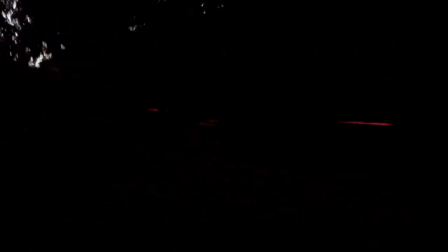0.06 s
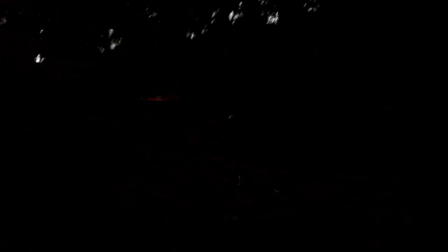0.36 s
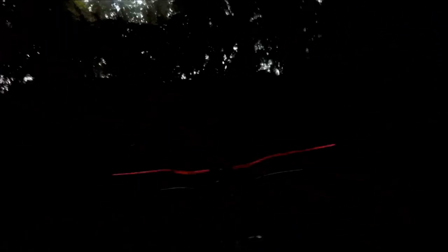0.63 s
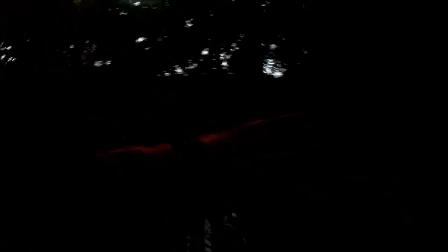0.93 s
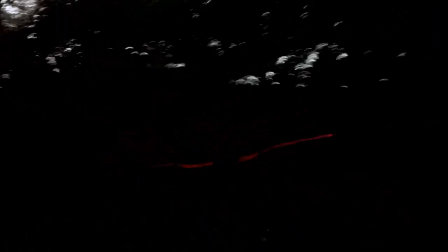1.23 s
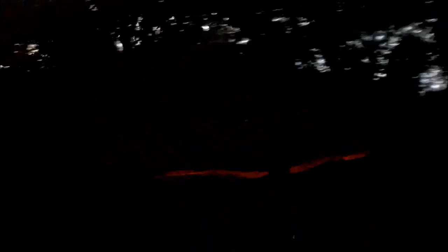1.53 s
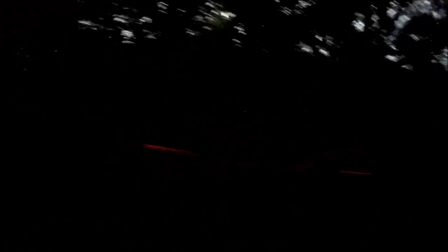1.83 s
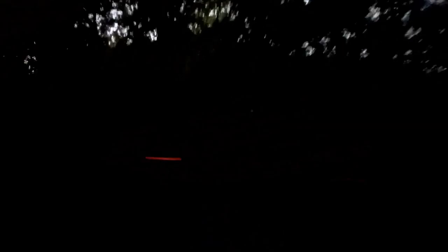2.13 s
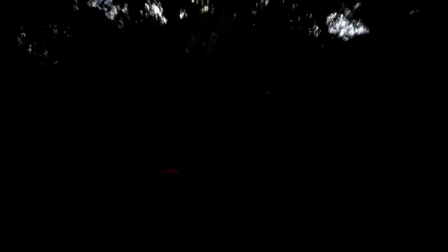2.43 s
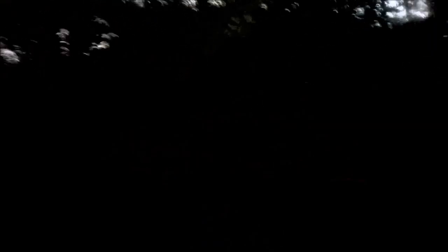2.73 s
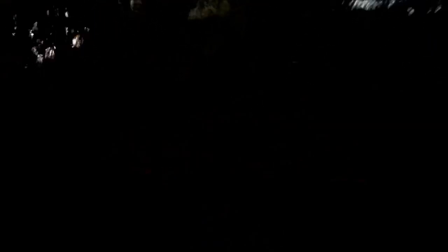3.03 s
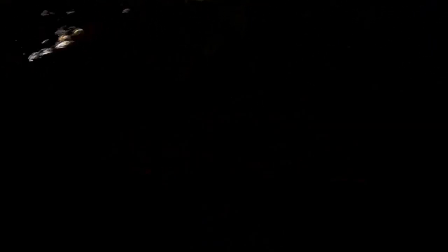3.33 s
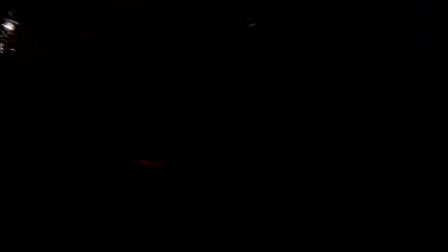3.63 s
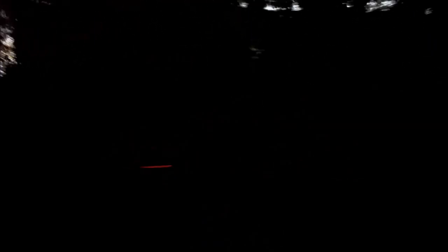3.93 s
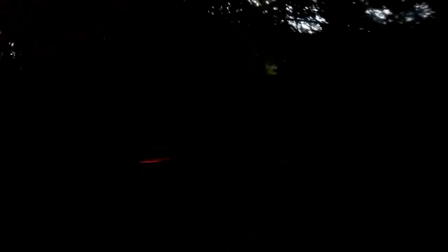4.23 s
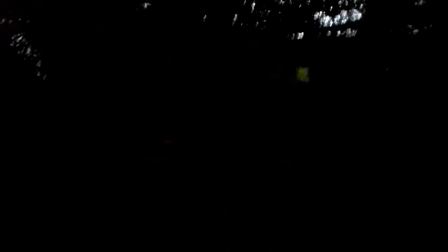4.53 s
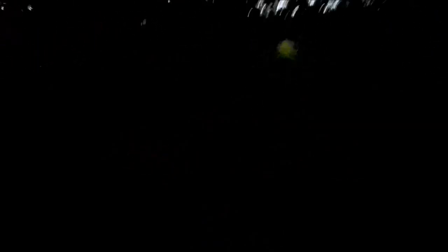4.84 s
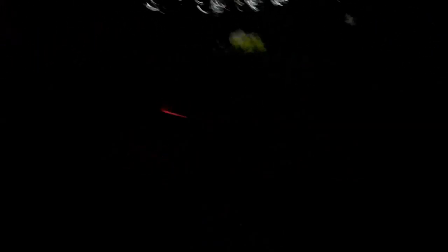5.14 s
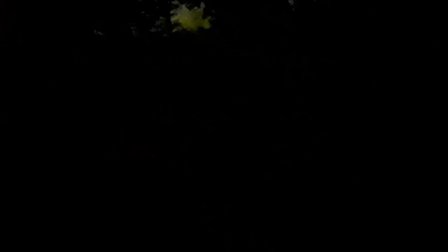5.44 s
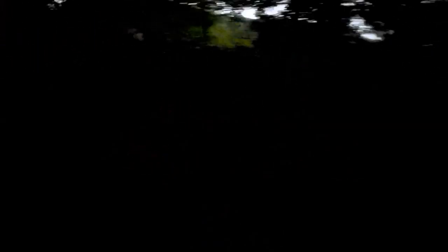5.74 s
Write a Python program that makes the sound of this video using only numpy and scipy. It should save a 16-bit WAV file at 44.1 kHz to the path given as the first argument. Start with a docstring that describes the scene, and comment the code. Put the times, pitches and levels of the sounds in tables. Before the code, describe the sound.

Heard from on board and without echo, bicycle tyres roll over loose grit and leaves on a wooded descent, while stones and chain tick against metal. Low gusts of wind rumble on the microphone. The bike then hits two rough stretches, separated by a brief lull, full of loud hollow knocks, tyre thumps, chain slaps and clattering levers. The wind is strongest in the second, and the rattling settles at the end.

```python
"""A mountain bike runs fast down a rough forest trail, heard from a camera carried on it.
At first the tyres crunch through grit and leaves, stones and chain tick on metal and a few jolts knock
the camera's mount. The trail smooths, and gusts buffet the microphone. From 2.3 s a long bed of roots
drives the bike into a dense rattle: the mount knocks, the chain slaps, cables and levers clack.
After a short lull, a second rough stretch brings the strongest wind; past 5.2 s the ride eases."""
import sys
import numpy as np
from scipy import signal
from scipy.fft import rfft, irfft, next_fast_len
from scipy.io import wavfile
from scipy.ndimage import uniform_filter1d, map_coordinates

SR = 44100
rng = np.random.default_rng(int(sys.argv[2]) if len(sys.argv) > 2 else 0)


def bounce(signal):
    """Save signal as a 16-bit WAV file at the path given by the first command-line argument."""
    frames = np.transpose(np.atleast_2d(signal))
    limited = np.clip(frames, -1, 1)
    pcm = np.round(limited * 32767).astype(np.int16)
    wavfile.write(sys.argv[1], SR, pcm)


N = 254456
t = np.arange(N) / SR

# Levels in the tables are relative: each source applies its own gain.
# Steady airflow between the gusts. Each row: time in seconds, level in dB.
AIRFLOW = [(0, -39.5), (.48, -46), (.7, -45), (1.4, -40.5), (2.0, -39), (3.4, -32.5), (3.7, -38),
           (4.5, -27), (5.77, -44.5)]
# Gusts on the microphone. Each row: start in seconds, length in seconds, level in dB.
GUSTS = [(.43, 0.054, -41), (.85, 0.059, -28.5), (.97, 0.12, -26.5), (1.09, 0.16, -25), (1.5, 0.12, -28),
         (1.6, 0.32, -24.5), (1.7, .2, -26), (1.95, 0.098, -34), (2.77, 0.1, -25.5), (3.03, 0.053, -28.5),
         (3.2, 0.083, -23.5), (3.33, 0.065, -38), (3.76, 0.088, -28.5), (4.06, 0.39, -31.5),
         (4.4, 0.1, -24.5), (4.58, 0.56, -22.5), (5.15, 0.19, -30.5), (5.58, 0.042, -29.5),
         (5.69, 0.092, -27)]
# Spectra of slow and of fast eddies. Each row: frequency in Hz, spectral density in dB.
SLOW_EDDY_SPECTRUM = [(10, -37), (25, 0), (40, 1), (75, -6.5), (130, -10), (300, -34.5), (1000, -73),
                      (5000, -120)]
FAST_EDDY_SPECTRUM = [(25, -20), (55, -3), (78, 6.5), (105, -1), (160, -3), (250, -8), (380, -13),
                      (1200, -59), (8000, -120)]

# Crunch of loose grit, and drone of the tread, which falls quiet on loose soil.
# Each row: time in seconds, level in dB.
CRUNCH_LEVEL = [(0, -45), (.25, -42.5), (.48, -49), (.7, -46.5), (1.17, -48.5), (1.33, -51), (1.47, -55),
                (1.7, -51), (2.1, -50.5), (2.301, -47), (2.75, -47), (3.5, -47.5), (3.68, -51.5),
                (3.8, -45), (4.45, -48), (4.85, -44), (5.1, -48), (5.24, -50), (5.77, -48.5)]
DRONE_LEVEL = [(0, -30.5), (.2, -30.5), (.5, -43), (1.4, -47.5), (2.4, -40.5), (5.0, -38), (5.77, -51)]
# Sprays of dry leaves and fine grit. Each row: start in seconds, length in seconds, level in dB.
SPRAYS = [(0, 0.016, -32.5), (.06, 0.035, -42.5), (.11, 0.092, -44), (.24, 0.073, -52), (.395, .035, -48),
          (.95, 0.33, -51), (3.53, 0.059, -49.5), (4.945, 0.055, -45), (5.04, 0.075, -48)]
# Spectra of the sounds under the tyres. Each row: frequency in Hz, spectral density in dB.
TREAD_SPECTRUM = [(110, -26.5), (160, 3.5), (195, 9.5), (250, 2.5), (300, 4), (420, 5), (800, -50),
                  (8000, -100)]
GRIT_SPECTRUM = [(700, -18), (1400, -13.5), (2050, 15.5), (2700, 3.5), (3400, 9), (3850, -1), (4350, 7.5),
                 (5500, 0), (6500, 2.5), (7400, -6.5), (8500, 1.5), (10000, -15), (15500, -18)]
FINE_GRIT_SPECTRUM = [(3000, -17), (5200, 5.5), (6500, -6.5), (7500, 3.5), (8600, -12), (10500, 2),
                      (13000, -1), (15500, -22)]
LEAF_SPECTRUM = [(3000, -21), (5200, 10), (7000, 4.5), (9000, 1), (12000, 1), (15000, -9)]

# Sharp metallic ticks of stones and chain.
# Each row: start in seconds, level in dB, pitch in Hz, crack over ring in dB.
METAL_TICKS = [(.0065, -12, 6500, -2), (.012, -28, 5200, -2), (.031, -24, 6500, 5), (.0518, -11, 9000, 16),
               (.08, -31, 4200, -5), (.1305, -26, 7500, 6), (.192, -32, 6000, -4), (.2035, -28, 5000, -7),
               (.2195, -28, 6500, 4), (.2617, -24, 9600, 15), (.3027, -22.5, 6560, -7),
               (.327, -31, 4500, -2), (.3527, -32, 8500, 6), (.405, -32, 4000, -4), (.4145, -30, 4900, -6),
               (.427, -35, 6000, 0), (.4605, -25, 6600, -3), (.525, -24, 4710, -5), (.5921, -26, 6300, -3),
               (.763, -32, 5000, -10), (.854, -24.5, 5460, -2), (.9087, -25, 6200, 2),
               (.968, -24.5, 4460, -7), (1.114, -28, 6500, -4), (1.1473, -19, 6140, 4),
               (1.4174, -26, 5070, -4), (1.4752, -29, 6260, -10), (1.5274, -31, 6300, -4),
               (1.5496, -23.5, 6400, 2), (1.6287, -30, 6160, 3), (1.667, -33, 5000, -1),
               (1.6806, -18.5, 5050, 3), (1.7097, -22, 6300, -8), (1.7766, -34, 6000, -3),
               (1.9789, -30.5, 6540, -2), (2.027, -29.5, 4700, 1), (2.0629, -24.5, 4930, -7),
               (2.706, -25.5, 6800, 9), (2.729, -20.5, 4900, -7), (2.779, -27, 5500, -3),
               (3.2404, -28.5, 6000, 0), (3.4896, -25, 6000, 10), (3.7588, -19, 5600, -6),
               (3.773, -24.5, 6200, -8), (3.827, -24, 4960, -5), (3.91, -27, 6400, -6),
               (4.0173, -22, 6080, -2), (4.1582, -25.5, 6550, -9), (4.548, -29, 6000, -5),
               (4.6094, -20, 4630, -11), (4.9742, -16, 6540, 1), (5.0644, -20.5, 5200, -1),
               (5.237, -30.5, 6300, 2), (5.283, -33, 8500, 5), (5.5972, -23, 5050, -1),
               (5.675, -27, 6500, 0), (5.6815, -24, 4600, -7), (5.693, -25, 6100, -9),
               (5.7401, -18, 6300, -7)]
# Crack that opens a metallic tick. Each row: frequency in Hz, spectral density in dB.
CRACK_SPECTRUM = [(1500, -28), (4000, -3), (5000, -1), (5600, -12), (6400, 4.5), (7300, -3), (8000, 0),
                  (9000, -0.5), (10300, -1.5), (11200, -11), (15000, -22)]
# Modes of the struck metal, of the chain with its stay, and of the hollow mount.
# Each row: frequency in Hz, level in dB, time to decay by 60 dB in seconds.
METAL_MODES = [(3390, 2, 0.013), (4480, -6, 0.011), (5000, -0.5, 0.016), (6390, 9, 0.0056),
               (7600, -7, 0.007), (8930, -8.5, 0.0077), (10260, -13, 0.0078), (11600, -4, 0.007)]
CHAIN_MODES = [(1920, -18, 0.02), (2470, 3, 0.01), (3410, 0.5, 0.019), (4380, 2.5, 0.009),
               (4800, -6, 0.014), (5770, 1, 0.012), (6080, -2.5, 0.016), (8100, -18, .012),
               (10800, -9, 0.0086)]
MOUNT_MODES = [(334, -7, 0.13), (438, 2.5, 0.04), (513, -6, 0.18), (658, 2.5, 0.029), (931, -7, 0.041)]
# Chain slaps. Each row: start in seconds, level in dB, level of the stay's ping in dB, its pitch in Hz.
CHAIN_SLAPS = [(.0075, -30, -21, 5360), (.0303, -22, -23, 3680), (0.1316, -24, -29, 4900),
               (0.147, -19, -20, 4400), (2.302, -10, -12, 4355), (2.319, -15, -27, 4350),
               (2.35, -16, -21, 4300), (2.789, -23.5, -20, 3220), (3.3505, -22, -23, 4830),
               (3.547, -17, -27, 4350), (3.8597, -19, -31, 4330), (4.369, -23, -20, 4425),
               (4.7163, -20, -32, 4400), (4.9577, -18, -13, 4270), (5.106, -18, -27, 4100)]
# Clacks of cables and levers, and soft blows from hollows in the trail.
# Each row: start in seconds, level in dB, pitch in Hz.
CLACKS = [(0.149, -23, 1900), (.266, -24, 1710), (0.943, -22, 1860), (1.821, -23, 1720), (2.8, -9.5, 2000),
          (3.01, -17, 1540), (3.037, -20, 1560), (3.273, -19, 2020), (3.549, -15.5, 1940),
          (3.803, -30, 1410), (3.783, -25, 1500), (3.971, -20.5, 1770), (3.997, -15.5, 1730),
          (4.128, -20.5, 1530), (4.185, -17, 1740), (4.273, -29, 1850), (4.343, -21, 1740),
          (4.614, -21, 1440), (4.7157, -13, 1800), (4.727, -20, 1950), (4.8, -15, 1890), (4.86, -23, 1880),
          (4.886, -20, 1950), (5.035, -14, 1880), (5.104, -13, 1900), (5.5755, -18, 1160)]
THUMPS = [(.066, -15, 290), (.137, -11, 280), (.478, -13, 192), (.7432, -14, 415), (1.148, -8.5, 106),
          (2.813, -5, 166), (2.878, -11, 141), (2.922, -12, 159), (3.06, -17, 150), (3.25, -11, 110),
          (4.801, -3, 120), (4.83, -9, 270), (4.947, -2.5, 245), (4.987, -16, 300), (5.069, -6, 148),
          (5.116, -3.5, 261)]
# Body of a clacking part. Each row: frequency as a multiple of its pitch, level in dB.
CLACK_SPECTRUM = [(.2, -14), (.48, -4), (.75, -3.5), (1.02, 5), (1.15, -0.5), (1.4, -20.5), (2.4, -21),
                  (6, -56)]

# Roughness of the trail, highest over the bed of roots. Each row: time in seconds, shaking in dB.
ROUGHNESS = [(0, -26), (.17, -29), (.45, -32.5), (.57, -38.5), (1.3, -36), (1.44, -46.5), (1.69, -34),
             (2.2, -32.5), (2.27, -22.5), (2.58, -18.5), (3.0, -20), (3.5, -21.5), (3.64, -34.5),
             (4.1, -27.5), (5.1, -28), (5.26, -33), (5.77, -36)]
# Single roots and rocks.
# Each row: start in seconds, length in seconds, shaking in dB, hard rattle over dull in dB.
BUMPS = [(0.07, 0.093, -30.5, -27), (0.386, 0.025, -26, -24), (0.677, .055, -37.5, -7),
         (1.255, 0.011, -30, -8), (1.473, .02, -37, -11), (1.672, 0.01, -35, -0.5), (2.186, 0.035, -40, 7),
         (2.237, 0.041, -26, -9), (2.284, 0.086, -19.5, -8), (2.441, 0.075, -17, -28),
         (2.54, 0.25, -21.5, -6), (2.782, 0.071, -16.5, -12), (2.87, 0.078, -17, -30),
         (3.02, 0.046, -27, 1.5), (3.23, 0.045, -26.5, -1), (3.324, 0.05, -22, -10),
         (3.49, 0.035, -17.5, -33), (3.541, 0.053, -18, -11), (3.792, 0.024, -20.5, -7),
         (3.908, 0.042, -27.5, -8), (3.989, 0.011, -24.5, -6), (4.05, 0.018, -24.5, -21),
         (4.165, 0.051, -24, -5.5), (4.251, 0.039, -25.5, -1), (4.335, 0.025, -23, -4.5),
         (4.701, 0.0095, -17.5, -6), (4.767, 0.12, -16.5, -8.5), (4.941, 0.021, -16, -5),
         (4.973, 0.03, -18, -10), (5.018, 0.12, -16.5, -7), (5.135, .07, -30, -8.5),
         (5.39, 0.06, -35.5, -2)]
# Part of the hard rattle made by cables and levers. Each row: time in seconds, share from 0 to 1.
CLATTER_SHARE = [(0, 0.35), (2.3, 0.49), (2.55, 0.68), (3.1, 0.67), (3.55, 0.49), (5.77, 0.3)]
# Spectra of the two rattles and of the mount. Each row: frequency in Hz, spectral density in dB.
DULL_RATTLE_SPECTRUM = [(50, -35), (130, -5.5), (185, 0.5), (245, -3), (295, 2), (337, 5), (385, 0),
                        (475, 2.5), (521, 5.5), (570, 3), (650, 3), (780, -5.5), (1000, -20), (1500, -38),
                        (8000, -100)]
HARD_RATTLE_SPECTRUM = [(400, -17.5), (750, -1.5), (940, 0), (1200, -6), (1550, -7), (1900, -1.5),
                        (2150, -6.5), (2500, -19), (3400, -23.5), (6000, -29.5), (14000, -88)]
MOUNT_SPECTRUM = [(40, -31.5), (120, -26), (200, -4.5), (270, -7), (335, -1), (410, -2), (520, 2), (660, 1),
                  (780, -4.5), (1000, -3), (1500, -16.5), (1950, -11), (2600, -41.5), (6000, -52)]
# Big jolts that knock the mount.
# Each row: start in seconds, level in dB, pitch in Hz, brightness in dB, hollow ring in dB.
JOLTS = [(0.1122, -20, 410, -7, -1), (0.2659, -13.5, 380, 8, -8), (0.2756, -21.5, 440, -7, -19),
         (0.318, -15, 480, -13, -17), (0.4722, -6.5, 486, -11.5, -14), (0.5268, -11, 590, 6, -14),
         (0.794, -15, 490, -15, -16), (0.8005, -20, 550, -13, -18), (0.855, -23, 470, 29, -6),
         (0.9688, -16.5, 550, 5, -14), (1.4808, -28, 450, -3, 0.5), (2.011, -20, 540, 3, -7),
         (2.078, -23, 640, -1, -18), (2.2827, -11, 490, 4, -1.5), (2.304, -5, 430, 17, -8),
         (2.3129, -7.5, 560, 0, -12), (2.435, -0.5, 493, -2, -13.5), (2.4779, -8, 500, 5.5, -14),
         (2.4979, -8, 500, -9, -20), (2.5305, -5, 590, -18, -9), (2.5543, -12, 610, 17, -15),
         (2.6401, -18, 560, 1, -7), (2.664, -10, 550, 1, -21), (2.724, -9, 400, -6, -16),
         (2.7343, -7, 398, -26, -19), (2.7453, -5, 630, -13, -13), (2.7916, -13, 550, 4, -15),
         (2.8083, -0.5, 430, -19, -12), (2.828, -7.5, 360, -9, -7), (2.892, -10, 380, -3, -12),
         (2.9147, -7, 534, -19, -25), (2.9242, -2.5, 560, -15, -14), (3.0526, -6, 460, -1, -13),
         (3.071, -11, 450, 7, -7), (3.1034, -0.5, 554, -6, -13), (3.164, -9.5, 560, 7.5, -4),
         (3.1988, -8.5, 520, -15, -18), (3.2932, -3.5, 458, 1, -28), (3.329, -9, 480, -12, 0),
         (3.3513, -4.5, 405, -10, -12), (3.3728, -6, 467, -6, -5.5), (3.4225, -5.5, 510, -3.5, -11),
         (3.4462, -6, 490, -5, -11), (3.4938, -2.5, 437, -27, -20), (3.5859, -6, 560, 11, -17),
         (3.798, -14, 620, 14, -14), (3.928, -15, 480, 39, -19), (4.0688, -24, 430, -3, -17),
         (4.2083, -12, 420, -13, -15), (4.2606, -9, 510, 16, -12), (4.2675, -9, 520, 2, -9),
         (4.2868, -5.5, 610, 11, -11), (4.3341, -10, 660, 24, -17), (4.3526, -13, 570, 4, -14),
         (4.5593, -11, 540, 15, -17), (4.72, -5, 500, 47, -13), (4.7525, -7.5, 450, 3, -9),
         (4.7997, -3, 510, 13, -16), (4.8112, -0.5, 476, -4, -22), (4.835, -11, 480, 1, -14),
         (4.8695, -6, 520, 7, -20), (4.882, -0.5, 590, 7, -30), (4.8907, -3.5, 610, -5, -13),
         (4.9525, -3, 400, 4, -9), (4.9592, -8, 550, 9, -25), (4.9643, -3.5, 540, 12, -18),
         (5.035, -3, 450, 6, -12), (5.0603, -3, 530, 22, -15), (5.071, -10, 310, -1, -14),
         (5.0849, -5, 560, 9, -26), (5.1215, -5.5, 410, -7, -29), (5.1325, -7, 630, 18, -17),
         (5.2048, -16, 360, -6, -21), (5.3797, -17, 540, 5, -11), (5.5765, -13, 820, 13, -16),
         (5.6853, -15, 594, 11, -10)]


def amp(db):
    """Amplitude grows tenfold for every 20 dB."""
    return 10 ** (np.asarray(db) / 20)


def decibels(power):
    """Level rises 10 dB for every tenfold power."""
    return 10 * np.log10(power + 1e-12)


def unit(x):
    """Normalisation to rms 1."""
    return x / np.sqrt(np.mean(x ** 2) + 1e-20)


def curve(rows):
    """Linear interpolation of (seconds, value) rows at every sample."""
    return np.interp(t, *np.transpose(rows))


def wobble(rate):
    """Slow random modulation: a spline through rate random values a second."""
    return map_coordinates(rng.standard_normal(int(N * rate / SR) + 4), [t * rate])


def add(track, start_s, sound):
    """Superposition: a sound adds to the track from its start time."""
    start = int(np.clip(round(start_s * SR), 0, N - 1))
    track[start:start + len(sound)] += sound[:N - start]


def swells(rows, attack_s, release_s):
    """Incoherent sources add in power; each (start, length, dB) event rises, holds and decays."""
    power = np.zeros(N)
    for start, length, db in rows:
        rise = np.clip((t - start) / attack_s, 0, 1)
        decay = np.exp(-np.maximum(t - start - length, 0) / release_s)
        power += (amp(db) * rise * decay) ** 2
    return power


def lowpass(x, hz, order):
    """Above its cutoff, the filter falls by 6 dB an octave for each order."""
    return signal.sosfilt(signal.butter(order, hz, fs=SR, output="sos"), x)


def response(spectrum, bright_db=0, corner_hz=850, size=8192):
    """Minimum-phase impulse response of a spectrum; bright_db lifts what lies above the corner."""
    hz = np.fft.rfftfreq(size, 1 / SR) + 1
    point_hz, point_db = np.transpose(spectrum)
    shelf_db = bright_db / (1 + (corner_hz / hz) ** 4)
    level_db = np.interp(np.log(hz), np.log(point_hz), point_db) + shelf_db
    cepstrum = irfft(np.log(amp(level_db)))
    cepstrum[1:size // 2] *= 2  # folding onto positive time makes the response causal
    cepstrum[size // 2 + 1:] = 0
    return irfft(np.exp(rfft(cepstrum)))[:size // 2]


def through(x, spectrum):
    """Source and filter: an excitation is convolved with a body's response, at rms 1."""
    return unit(signal.fftconvolve(x, response(spectrum))[:N])


def steady(x, size):
    """Division by the running rms evens out a texture's swells and keeps its grain."""
    power = uniform_filter1d(uniform_filter1d(x ** 2, size), size)
    return x / np.sqrt(np.abs(power) + 1e-4)


def patchy(x, depth_db):
    """Spectral modulation: patches some 600 Hz by 70 ms swell and sink."""
    spectrogram = signal.stft(x, nperseg=512)[2]
    field = uniform_filter1d(rng.standard_normal(spectrogram.shape), 7, axis=0)
    field = unit(uniform_filter1d(field, 12, axis=1))
    return unit(signal.istft(spectrogram * amp(depth_db * field), nperseg=512)[1][:N])


def contacts(rate, spread_db):
    """Shot noise: independent impulses of uneven size, rate a second, at rms 1."""
    struck = rng.random(N) < rate / SR
    size = np.clip(rng.standard_normal(N), -2, 2)
    sign = rng.choice([-1, 1], N)
    return unit(struck * sign * amp(spread_db * size))


def chance_events(rate, levels):
    """Independent events, rate a second: (start, level at that time, two deviations of variance 1)."""
    draws = rng.random((int(rate * N / SR), 3))
    starts = draws[:, 0] * N / SR
    deviations = np.sqrt(12) * (draws[:, 1:] - .5)
    return zip(starts, np.interp(starts, *np.transpose(levels)), *deviations.T)


def grains(rate, hz, scatter, cycles, spread_db, samples=400):
    """Many small damped oscillators, each falling 60 dB in the given number of cycles, at rms 1."""
    number = int(rate * N / SR)
    starts = rng.integers(0, N, (number, 1))
    pitch, size, phase = rng.standard_normal((number, 3)).T[:, :, None]
    turns = np.minimum(hz * np.exp(scatter * pitch), SR / 3) * t[:samples]
    envelope = amp(spread_db * np.clip(size, -2, 2) - 60 * turns / cycles) * (1 - np.exp(-2 * turns))
    waves = envelope * np.sin(2 * np.pi * (turns + phase))
    positions = starts + np.arange(samples)
    return unit(np.bincount(positions.ravel(), waves.ravel(), N)[:N])


def ring(modes, detune):
    """Free vibration is a sum of damped modes; their strengths and pitches vary from blow to blow."""
    age = t[:2048]
    hz, db, t60 = np.transpose(modes)[:, :, None]
    shift, strength, phase = rng.standard_normal((3, len(modes), 1))
    hz = np.minimum(hz * np.exp(detune * shift), SR / 2)
    envelope = amp(db + 1.3 * strength - 60 * age / t60)
    return np.sum(envelope * np.sin(2 * np.pi * (hz * age + phase)), axis=0)


def wind(usual_gust_db=-29.5):
    """Turbulence: eddies break on the microphone, and stronger gusts favour smaller, faster ones."""
    air_power = amp(curve(AIRFLOW)) ** 2 + swells(GUSTS, attack_s=0.023, release_s=0.041)
    gust_db = decibels(air_power) - usual_gust_db
    rumble = steady(through(rng.standard_normal(N), SLOW_EDDY_SPECTRUM), size=3000)
    flutter = steady(through(rng.standard_normal(N), FAST_EDDY_SPECTRUM), size=1800)
    flutter = unit(flutter * amp(1.3 * wobble(24)))
    return amp(0.55 * gust_db - 32.5) * rumble + amp(1.61 * gust_db - 35.5) * flutter


def tyres(hard_bumps):
    """Crushing noise: countless snaps of grit and leaves merge into a hiss over the tread's drone."""
    crunch_power = amp(curve(CRUNCH_LEVEL)) ** 2 + amp(-24.5) ** 2 * hard_bumps
    crunch_db = decibels(crunch_power) + 2.08 * wobble(60)
    hiss = patchy(through(rng.standard_normal(N), GRIT_SPECTRUM), depth_db=1.1)
    snaps = lowpass(grains(rate=260, hz=4950, scatter=0.283, cycles=22, spread_db=5.0), 10300, order=4)
    fizz = patchy(through(contacts(rate=1800, spread_db=2.5), FINE_GRIT_SPECTRUM), depth_db=1.5)
    leaves = patchy(through(contacts(rate=1300, spread_db=2.5), LEAF_SPECTRUM), depth_db=3.0)
    tread = through(rng.standard_normal(N), TREAD_SPECTRUM)
    spray = np.sqrt(swells(SPRAYS, attack_s=0.0018, release_s=0.016))
    # the crunch sounds brighter when louder and duller when quieter
    relative_db = crunch_db + 44.5
    snap_gain = np.hypot(amp(1.1 * relative_db - 51.0), 0.69 * spray)
    grit = amp(crunch_db + 1.5) * hiss + snap_gain * snaps + amp(1.33 * relative_db - 54.5) * fizz
    return grit + spray * leaves + amp(curve(DRONE_LEVEL)) * tread


def metal_ticks():
    """A brief, hard contact excites high modes: a crack, then a few milliseconds of metallic ring."""
    out, age = np.zeros(N), t[:2048]
    # small stones add ticks at random, harder where the grit is deep
    random_ticks = [(start, db + 3.5 + 9 * min(size, 1), 5800 * np.exp(0.17 * pitch), -7)
                    for start, db, size, pitch in chance_events(rate=14, levels=CRUNCH_LEVEL)]
    for start, db, hz, crack_db in [*METAL_TICKS, *random_ticks]:
        modes = [(f, level - 9 * np.log2(f / hz) ** 2, t60) for f, level, t60 in METAL_MODES]
        note = unit(ring(modes, detune=0.019))
        burst = rng.standard_normal(len(age)) * (amp(-60 * age / 0.003) + amp(-20 - 60 * age / 0.018))
        # a sharper edge makes the crack louder, and the very sharpest also brighter
        edge = response(CRACK_SPECTRUM, 1.6 * max(crack_db - 4, 0), corner_hz=11500, size=1024)
        crack = unit(signal.fftconvolve(burst, edge)[:len(age)])
        tick = (note + amp(crack_db) * crack) * (1 - np.exp(-age / 0.00018))
        add(out, start + .0005, amp(db - 23.0) * unit(tick))
    return out


def chain_slaps(ping_attack_s=0.00089, ping_t60_s=0.012):
    """Multiple impact: the chain lands link by link, and the stay that it hits pings on one mode."""
    out, age = np.zeros(N), t[:2048]
    ping_envelope = amp(-60 * age / ping_t60_s) * (1 - np.exp(-age / ping_attack_s))
    for start, db, ping_db, ping_hz in CHAIN_SLAPS:
        links = np.zeros(N)
        for delay in [0, *rng.uniform(0, 0.013, 4)]:
            add(links, delay, amp(-60 * delay / 0.057) * ring(CHAIN_MODES, detune=0.013))
        add(out, start, amp(db - 26.0) * unit(links[:2400]))
        add(out, start, amp(ping_db - 1.5) * ping_envelope * np.sin(2 * np.pi * ping_hz * age))
    return out


def cable_clacks(t60_s=0.023, rebound_db=-14):
    """Inelastic rebound: a cable or lever strikes twice, more weakly again, on a broad resonance."""
    out, age = np.zeros(N), t[:2048]
    for start, db, hz in CLACKS:
        rebound_age = age - 0.0092 * rng.uniform(0.59, 0.93)
        rebound = (rebound_age > 0) * amp(rebound_db - 60 * np.abs(rebound_age) / t60_s)
        bursts = (amp(-60 * age / t60_s) + rebound) * rng.standard_normal(len(age))
        body = response([(ratio * hz, level) for ratio, level in CLACK_SPECTRUM], size=2048)
        add(out, start, amp(db - 19.5) * unit(signal.fftconvolve(bursts, body)[:len(age)]))
    return out


def tyre_thumps(attack_s=0.0074, t60_s=0.037):
    """Damped oscillation: a tyre bottoms out and the bike swings a few times on one low note."""
    out, age = np.zeros(N), t[:4096]
    envelope = amp(-60 * age / t60_s) * (1 - np.exp(-age / attack_s))
    for start, db, hz in THUMPS:
        add(out, start, amp(db + 5.0) * envelope * np.sin(2 * np.pi * hz * age))
    return out


def bump_power(attack_s=0.0066, release_s=0.0095):
    """Vibration builds up and settles at each root or rock: the power of dull and of hard shaking."""
    dull = [(start, length, db) for start, length, db, _ in BUMPS]
    hard = [(start, length, db + hard_db) for start, length, db, hard_db in BUMPS]
    return swells(dull, attack_s, release_s), swells(hard, attack_s, release_s)


def rattle(dull_bumps, hard_bumps, waver_db=1.48):
    """Structure-borne sound: dense blows of loose parts reach the microphone through the mount."""
    trail_db = curve(ROUGHNESS) + waver_db * wobble(35)
    dull_db = decibels(amp(trail_db) ** 2 + dull_bumps) - 1.5
    hard_db = decibels(amp(trail_db - 9.5 + waver_db * wobble(30)) ** 2 + hard_bumps)
    blows = contacts(rate=560, spread_db=2.0)
    dull = steady(through(blows + 0.42 * rng.standard_normal(N), DULL_RATTLE_SPECTRUM), size=1100)
    hard = through(blows + .3 * rng.standard_normal(N), HARD_RATTLE_SPECTRUM)
    # under long shaking, cables and levers clatter too, each with its own note
    clatter = grains(rate=750, hz=1371, scatter=0.288, cycles=44, spread_db=3.0, samples=1000)
    clatter = unit(lowpass(clatter, 1730, order=6))
    share = curve(CLATTER_SHARE)
    hard = steady((1 - share) * hard + share * clatter, size=1100)
    return amp(dull_db) * dull + amp(hard_db) * hard


def mount_knocks(focus_db=7, focus_octaves=0.53):
    """Impulse response: each jolt pushes the mount, which rings hollowly; harder contact is brighter."""
    out = np.zeros(N)
    pole = np.exp(-2 * np.pi * 600 / SR)
    ring_rise = 1 - np.exp(-t[:2048] / 0.0011)
    # lesser jolts come at random, as strong as the trail is rough
    lesser_jolts = [(start, db + 5, 500 * np.exp(0.26 * pitch), 9 * brightness, -8)
                    for start, db, pitch, brightness in chance_events(rate=6.9, levels=ROUGHNESS)]
    for start, db, hz, bright_db, ring_db in [*JOLTS, *lesser_jolts]:
        body = [(f, level + focus_db * np.exp(-(np.log2(f / hz) / focus_octaves) ** 2))
                for f, level in MOUNT_SPECTRUM]
        push = -response(body, bright_db - 3.0)
        # dispersion, as an all-pass: bending waves carry the high notes ahead of the low ones
        dispersed = signal.lfilter([pole, -1], [1, -pole], push)
        knock = lowpass(dispersed, 2420, order=3)
        crest = np.argmax(np.abs(knock))
        add(out, start - crest / SR, amp(db - 1.45) * knock / knock[crest])
        ring_gain = amp(db + ring_db - 2.0 - 0.17 * max(bright_db, 0))
        add(out, start + 0.00192, ring_gain * ring(MOUNT_MODES, detune=0.036) * ring_rise)
    return out


def scene():
    """Direct sound only: the close sources add in one channel, without reverberation."""
    dull_bumps, hard_bumps = bump_power()
    shaking = rattle(dull_bumps, hard_bumps)
    impacts = mount_knocks() + tyre_thumps() + cable_clacks() + metal_ticks() + chain_slaps()
    return (shaking + impacts + tyres(hard_bumps) + wind())[None]


def record(dry):
    """Saturation and band limiting: the camera rounds the highest peaks and cuts the top treble."""
    ceiling, top_hz = .95, 15450
    rounded = dry / (1 + np.abs(dry / ceiling) ** 8) ** (1 / 8)
    size = next_fast_len(N + 8192)
    hz = np.fft.rfftfreq(size, 1 / SR)
    return irfft(rfft(rounded, size) / (1 + (hz / top_hz) ** 120), size)[:, :N]


dry = scene()
out = record(dry)
bounce(out)
```